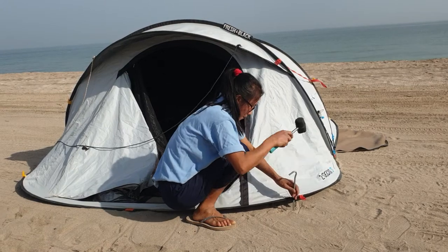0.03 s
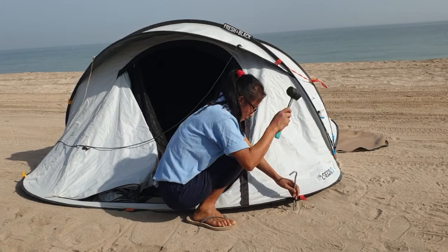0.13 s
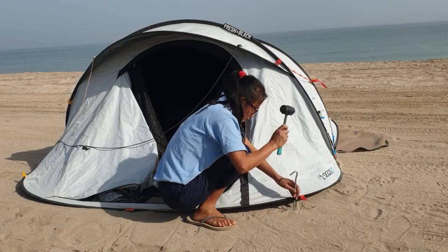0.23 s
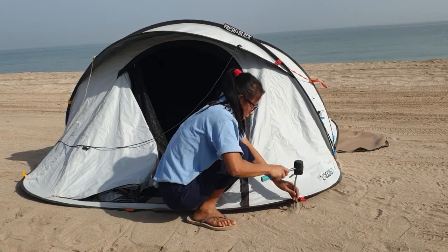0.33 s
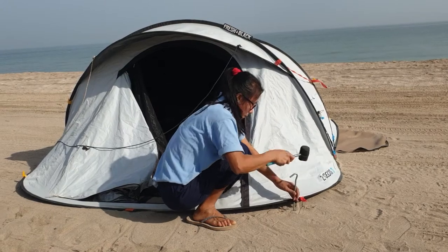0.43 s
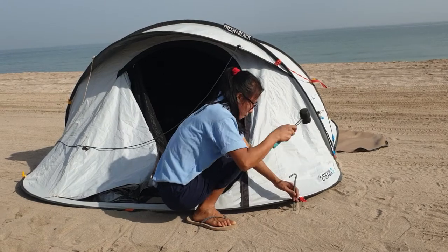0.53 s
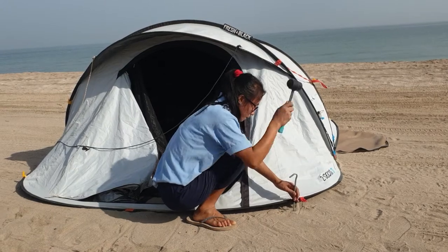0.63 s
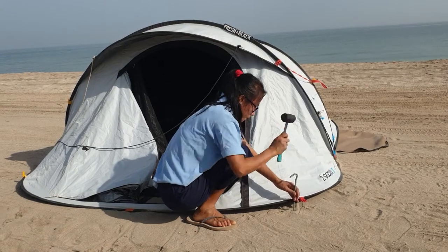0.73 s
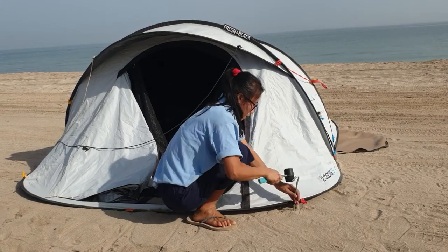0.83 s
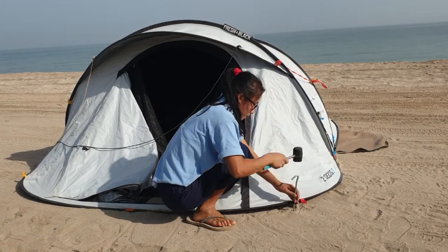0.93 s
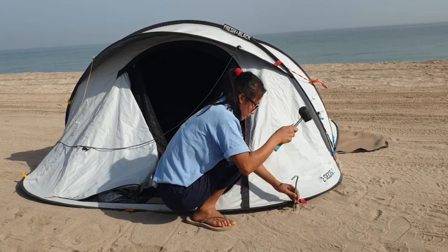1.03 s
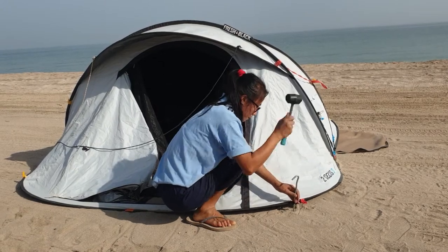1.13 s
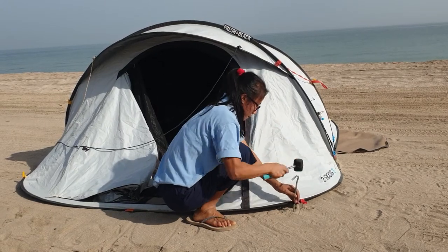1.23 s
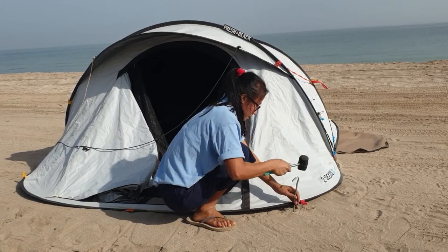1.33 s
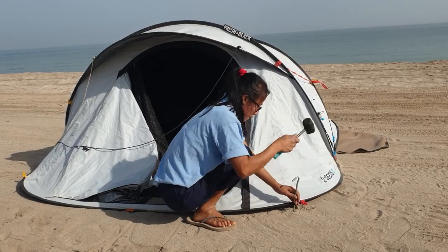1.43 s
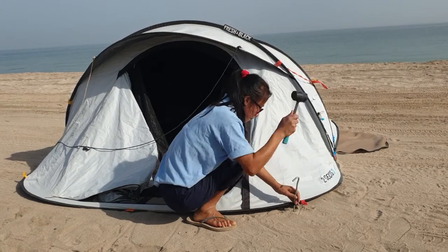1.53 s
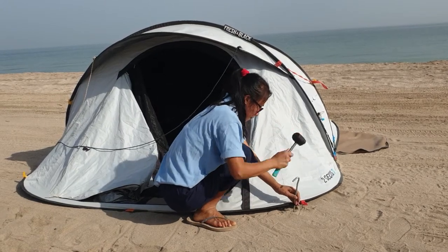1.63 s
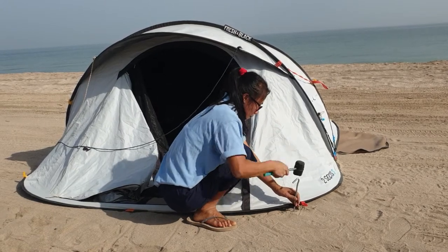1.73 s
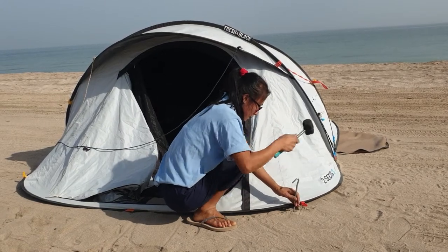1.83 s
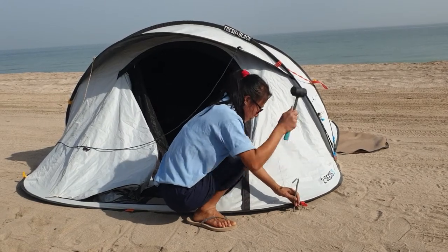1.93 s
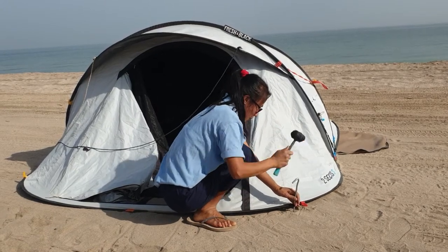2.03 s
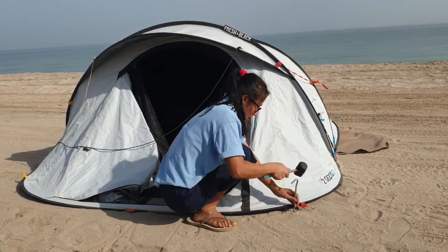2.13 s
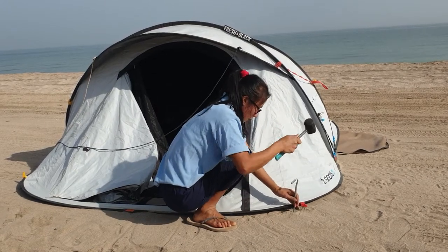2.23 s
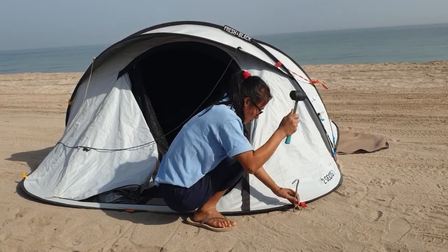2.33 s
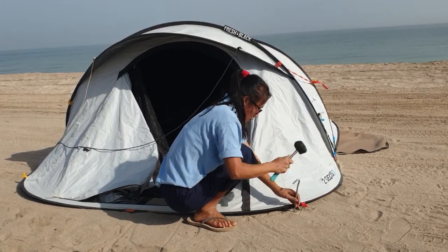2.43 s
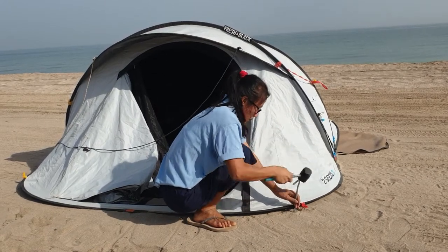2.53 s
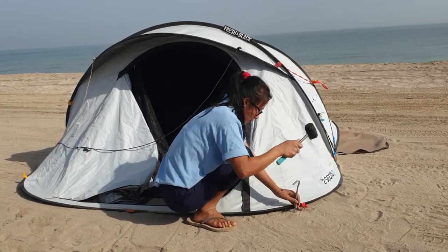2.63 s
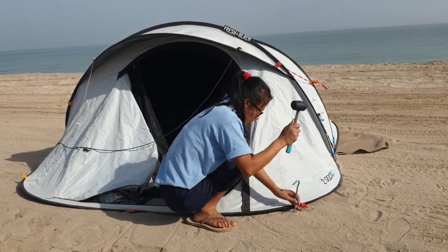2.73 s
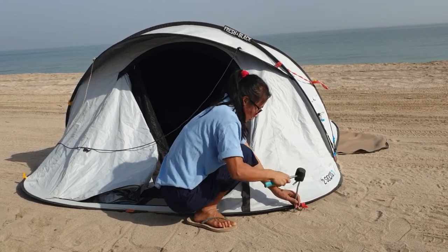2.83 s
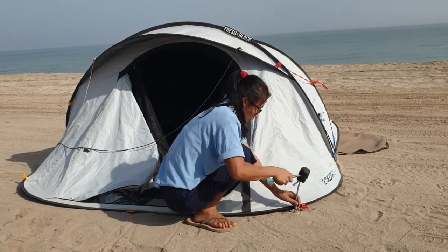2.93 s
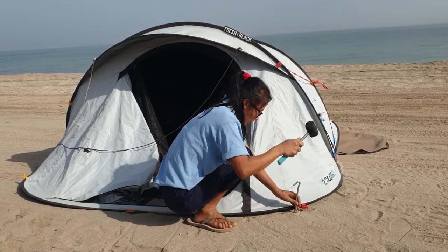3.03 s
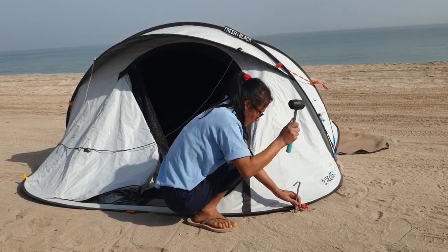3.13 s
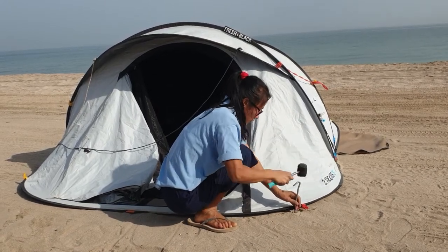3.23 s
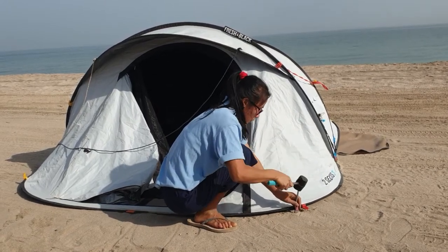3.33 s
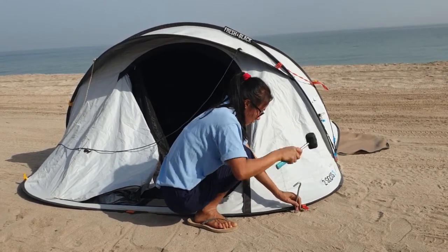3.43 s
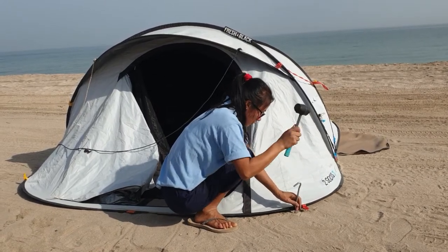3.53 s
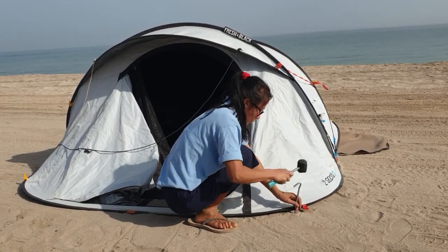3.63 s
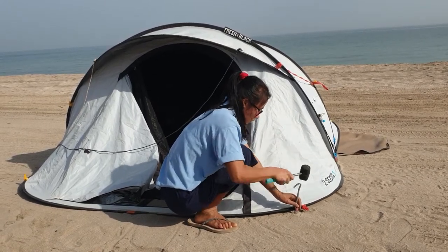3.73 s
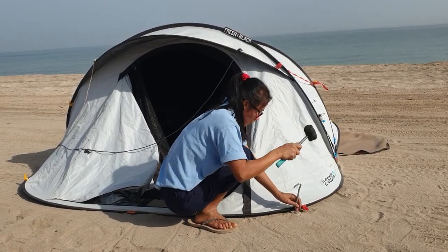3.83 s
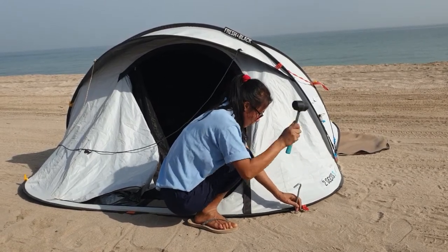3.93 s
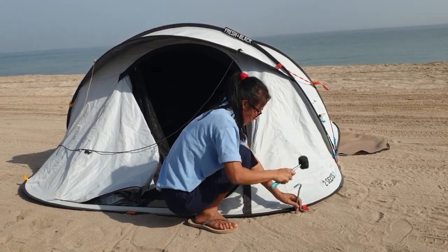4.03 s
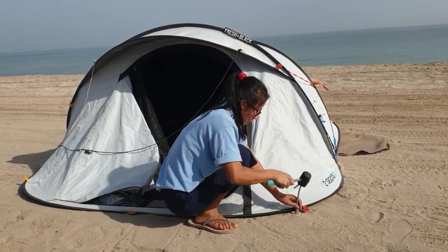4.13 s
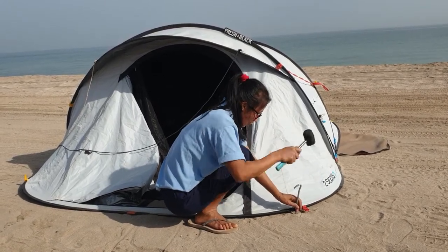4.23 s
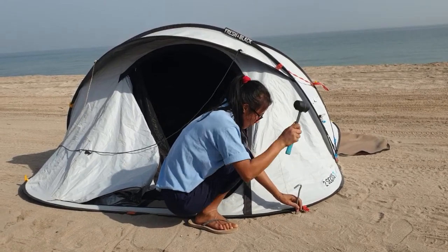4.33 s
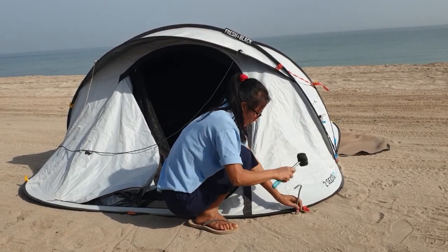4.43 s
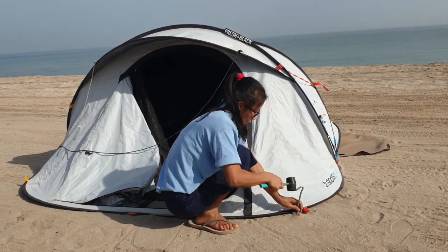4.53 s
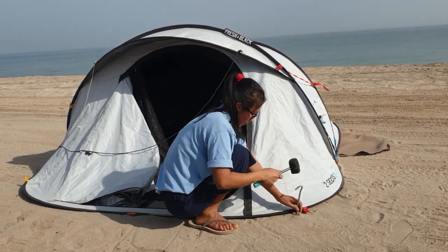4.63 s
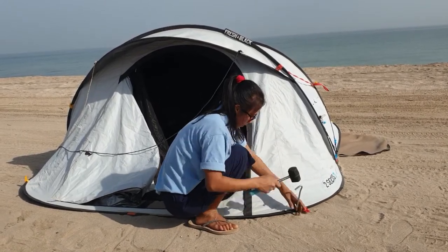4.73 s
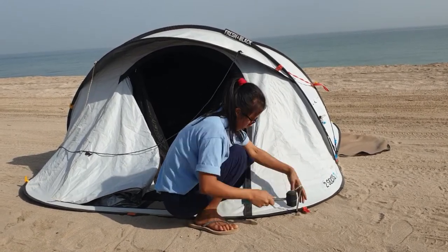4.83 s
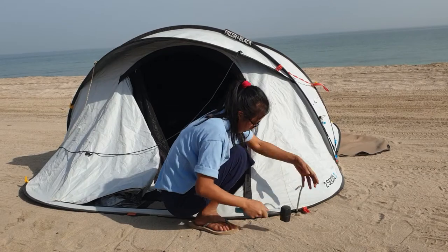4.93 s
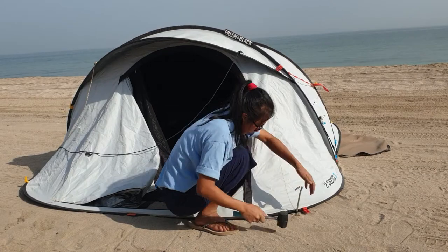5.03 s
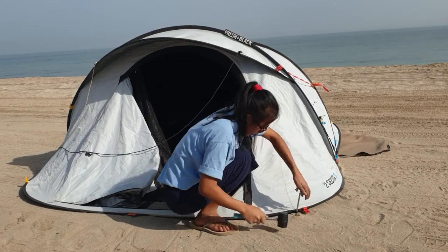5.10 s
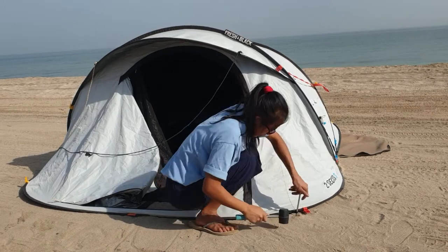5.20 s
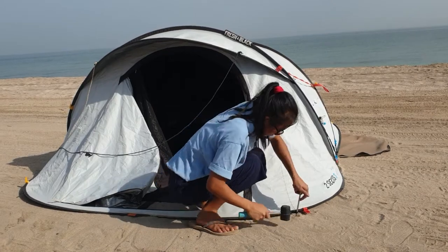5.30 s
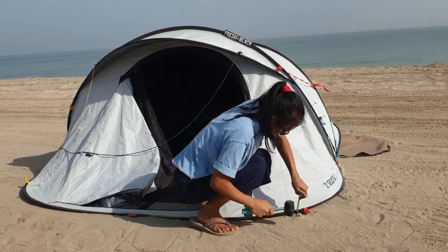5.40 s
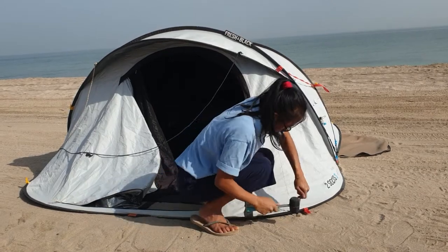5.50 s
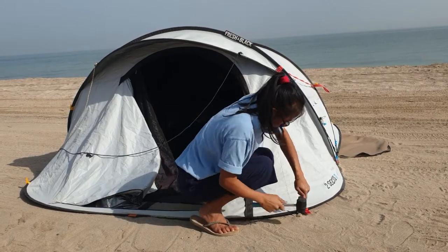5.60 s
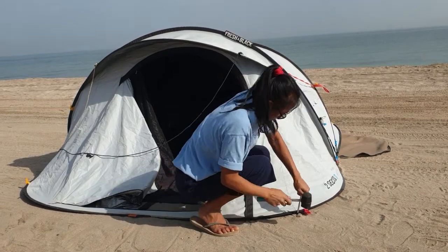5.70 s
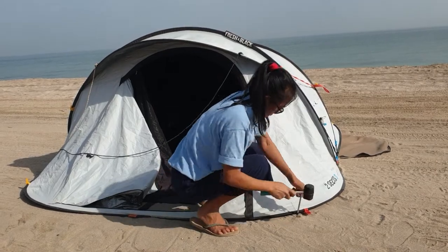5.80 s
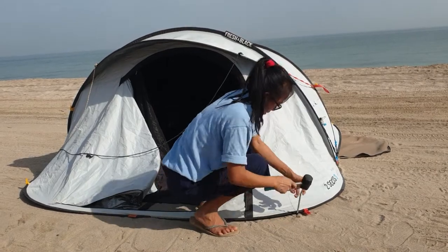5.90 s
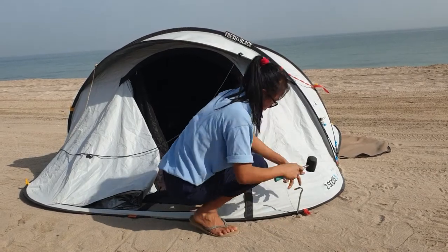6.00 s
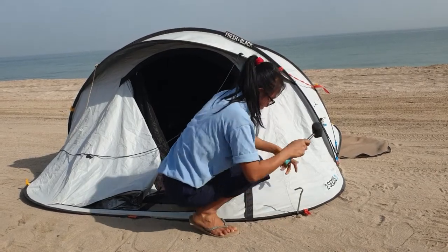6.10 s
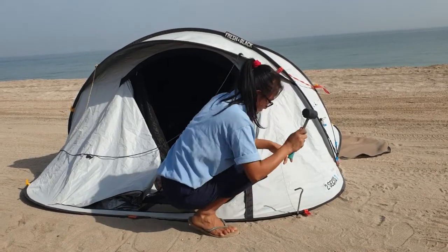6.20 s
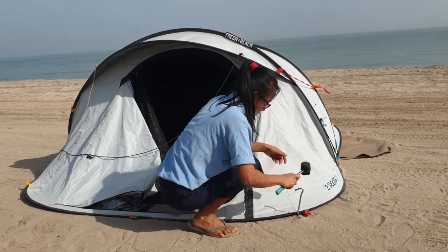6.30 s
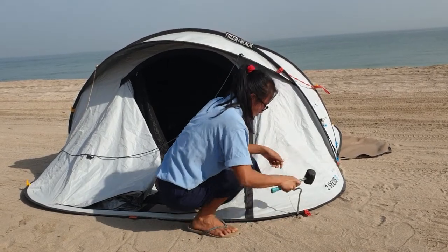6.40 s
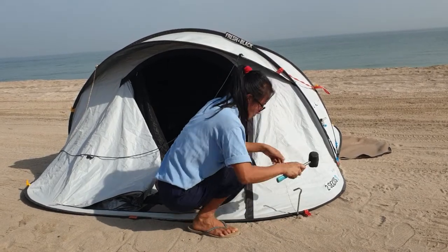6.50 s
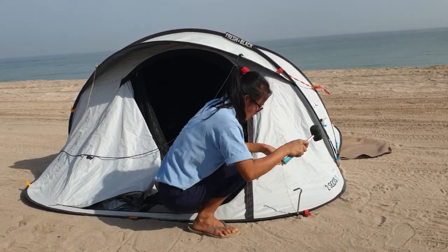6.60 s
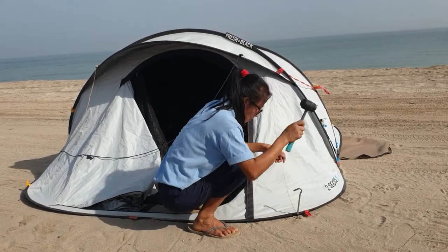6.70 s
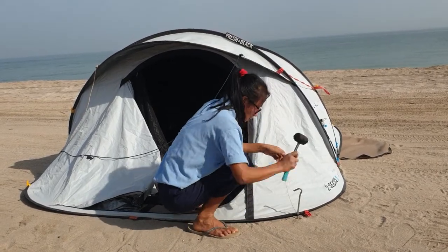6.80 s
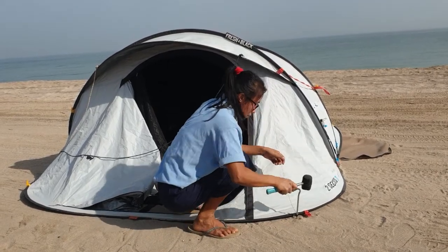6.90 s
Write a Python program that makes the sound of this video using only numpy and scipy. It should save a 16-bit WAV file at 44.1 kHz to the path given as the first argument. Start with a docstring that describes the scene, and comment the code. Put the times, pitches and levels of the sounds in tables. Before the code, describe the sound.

Outdoors on an open beach, close stereo microphone with faint hiss. A low breeze rumble and small soft waves run throughout, swelling most near 3.5 and 5.9 s. Slightly right, a rubber mallet strikes a steel peg in sand at 0.35, 0.83, 1.3, 1.7, 2.1, 2.5, 2.9, 3.3, 3.7, 4.1 and 4.5 s. Each blow is a short dull thud with a damped metallic knock, fine gritty crack and trickling grains; light rebounds follow some. The thud begins low and loose and rises quickly in pitch over the first several blows as sand packs, the trickle shortening. Very faint gliding bird chirps appear before 2.8 s. From 4.7 s cloth rustles; a scratchy tick sounds left at 5.15, soft bumps at 5.3 and 5.8-5.9, scuffs and stronger rustling around 6.0-6.1. Two firm, higher blows land at 6.36 and 6.89 s, with a brief rustle between.

```python
"""Hammering a tent peg on a beach

A rubber mallet drives a steel peg into sand beside a tent: thuds, damped steel modes and grain cracks,
the thud rising in pitch as the sand packs. Decaying grains trickle after each blow. Soft bumps and
scuffs fill a pause as the mallet is set down; clothes rustle as swelling clumps of grains.
Small waves, swells of filtered noise, break over a low breeze, with a few far gliding bird chirps."""
import sys
import numpy as np
from scipy import signal
from scipy.fft import rfft, irfft, next_fast_len
from scipy.io import wavfile

SR = 44100
rng = np.random.default_rng(int(sys.argv[2]) if len(sys.argv) > 2 else 0)


def wav_record(signal):
    """Record a signal, one row per channel, as 16-bit PCM in the file named by sys.argv[1]."""
    frames = np.transpose(np.atleast_2d(signal))
    bounded = np.clip(frames, -1, 1)
    # unit amplitude maps onto the largest positive 16-bit level
    quanta = np.round(bounded * 32767).astype(np.int16)
    wavfile.write(sys.argv[1], SR, quanta)


N = 306737
BLOW_SIZE = SR // 4   # samples
AGE_S = np.arange(BLOW_SIZE) / SR

# mallet on peg: (time [s], force [dB], sand's grip on the shaft [0-1], hook clack [dB], crack [dB])
BLOWS = [(0.346, -2.5, 0.19, -42, -37), (0.8315, -1.5, 0.31, -39, -37), (1.293, -2, 0.28, -36, -38.5),
         (1.715, 0.1, 0.2, -36.5, -36), (2.1179, 0.5, 0.27, -42, -39), (2.5093, 0, 0.41, -33, -38.5),
         (2.8883, 0.4, 0.5, -32.5, -35.5), (3.2925, 0.5, 0.68, -27.5, -33.5),
         (3.6962, 0.7, 0.66, -43, -40.5), (4.099, 1.3, 0.74, -32, -37.5), (4.501, 0.5, 1, -30.5, -36),
         (6.3644, 0.35, 0.77, -35.5, -39.5), (6.8889, 0, 0.93, -33, -35.5)]
# steel on sand grains, relative spectrum: (frequency [Hz], density [dB per Hz])
CRACK_SPECTRUM = [(2500, -4.5), (3800, -1.5), (5000, -0.5), (6200, 1), (7500, -0.5), (9000, -10),
                  (10700, -4.5), (13000, -11.5), (16000, -11.5)]


def from_db(db):
    """Decibels to gain."""
    return 10 ** (np.asarray(db) / 20)


def rms_one(x):
    """Scale to rms 1."""
    return x / np.sqrt(np.mean(x ** 2) + 1e-20)


def at_level(x, db):
    """Scale a short sound so that its energy, spread over 20 ms, has this level."""
    return from_db(db) * x / np.sqrt(np.sum(x ** 2) / (0.02 * SR) + 1e-20)


def add(track, time_s, sound):
    """Mix a sound into a track at a given time."""
    i = max(0, round(time_s * SR))
    track[i:i + len(sound)] += sound[:N - i]


def delayed(x, delay_s):
    """Delay by a phase ramp, which allows fractions of a sample."""
    size = next_fast_len(len(x) + SR // 10)
    phase = np.exp(-2j * np.pi * np.fft.rfftfreq(size, 1 / SR) * delay_s)
    return irfft(rfft(x, size) * phase, size)[:len(x)]


def cut(x, hz, kind, order=2):
    """Butterworth low- or high-pass."""
    sos = signal.butter(order, min(hz, SR / 2 - 1), kind, fs=SR, output="sos")
    return signal.sosfilt(sos, x)


def colour(x, spectrum):
    """Causal (minimum-phase) filter that follows a spectrum."""
    size = 4096
    hz, db = np.transpose(spectrum)
    grid_hz = np.maximum(np.fft.rfftfreq(size, 1 / SR), 1)
    gain = from_db(np.interp(np.log(grid_hz), np.log(hz), db))
    # folding the cepstrum onto positive time gives minimum phase
    cepstrum = irfft(np.log(gain))
    cepstrum[1:size // 2] *= 2
    cepstrum[size // 2 + 1:] = 0
    response = irfft(np.exp(rfft(cepstrum)))
    return signal.fftconvolve(x, response)[:len(x)]


def drift(rate_hz):
    """Slow random wander of rms 1: two-pole filtered noise, computed every 40 samples."""
    step = 40
    pole = np.exp(-2 * np.pi * rate_hz * step / SR)
    noise = rng.standard_normal(N // step + 2002)
    slow = signal.lfilter([1], [1, -2 * pole, pole * pole], noise)[2000:]   # settled part
    return np.interp(np.arange(N) / step, np.arange(len(slow)), rms_one(slow))


def dying(t60_s):
    """Envelope that falls 60 dB in t60."""
    return np.exp(-np.log(1000) * AGE_S / t60_s)


def swell(peak_s, rise_s, fall):
    """A smooth hump of height 1 that falls this many times as slowly as it rises."""
    t = np.arange(N) / SR - peak_s
    width_s = np.where(t < 0, rise_s, rise_s * fall)
    return 1 / (1 + (t / width_s) ** 2 / 2) ** 1.5


def between(loose, packed, share):
    """A value part of the way from loose to packed sand."""
    return loose + share * (packed - loose)


def grains(size, spread_db):
    """Dense tiny clicks of uneven size."""
    size_db = spread_db * np.clip(rng.standard_normal(size), -2, 2)
    return rms_one(rng.standard_normal(size) * from_db(size_db))


def wide_noise(spectrum, side_db):
    """Noise that is partly different at the two ears."""
    mid, side = [rms_one(colour(rng.standard_normal(N), spectrum)) for _ in range(2)]
    return mid + from_db(side_db) * side * [[1], [-1]]


def ring(modes, scatter_db):
    """Struck modes, each a decaying sine with a slightly new strength."""
    out = np.zeros(BLOW_SIZE)
    for hz, t60_s, db in modes:
        gain = from_db(db + scatter_db * rng.normal())
        out += gain * dying(t60_s) * np.sin(2 * np.pi * hz * AGE_S)
    return out


def hammering():
    """Blows, rebounds and bumps, with the grit that each blow shakes loose."""
    # peg modes, damped by sand and hand:
    # (frequency [Hz], t60 [s], loose-sand relative level [dB], firm-sand relative level [dB])
    peg_modes = [(394.7, 0.11, -46, -9), (680, 0.016, -22, 6.5), (798, 0.017, 18, -48),
                 (1017, 0.021, -3, -17), (1290, 0.017, -34, -8), (1459, 0.024, -19.5, -21)]
    # high modes of the peg's hook, same columns: (frequency [Hz], t60 [s], loose [dB], firm [dB])
    hook_modes = [(1465, 0.02, 5, 5.5), (2103, 0.016, 7.5, -18), (2610, 0.025, -12, 1),
                  (3200, 0.012, 4, -.5), (4960, 0.024, -31, 4)]
    # mallet touches the peg again on the rebound: (time [s], ring level [dB], crack level [dB])
    rebounds = [(.845, -54, -51), (1.338, -56, -74), (1.742, -40.5, -55), (2.158, -37, -50),
                (2.548, -45, -62), (3.362, -56, -56), (4.511, -37, -42.5), (4.652, -62, -69),
                (6.618, -55.5, -71.5)]
    # soft bumps on the sand: (time [s], pitch [Hz], level [dB])
    bumps = [(5.271, 228, -37), (5.346, 177, -34), (5.787, 244, -39), (5.93, 226, -37.5)]
    # trickling sand: (frequency [Hz], density [dB per Hz])
    grit_spectrum = [(300, -6), (700, -2), (1300, -3), (2000, 2.5), (3000, -3.5), (5000, 1), (7500, -1.5),
                     (10000, -18.5), (13000, -10), (16000, -14)]
    packing_blows, packing_curve = 3.3, 1.23   # blows to two thirds packed; >1: first blows pack less

    out, grit = np.zeros(N), np.zeros(N)
    for blows_so_far, (time_s, force_db, grip, clack_db, crack_db) in enumerate(BLOWS):
        packed = 1 - np.exp(-(blows_so_far / packing_blows) ** packing_curve)
        thud_hz = between(120, 275, packed)
        thud_db = force_db + between(-26.5, -21.5, packed)
        ring_db = force_db + between(-23, -24.5, packed)
        grit_db = crack_db + between(-5, -2.5, packed)   # ahead of grit_spectrum
        grit_t60_s = between(0.39, 0.22, packed)   # loose sand trickles for longer
        # the peg's ring starts just before the thud and crack
        add(out, time_s - 0.0005, at_level(gripped_ring(peg_modes, grip), ring_db))
        add(out, time_s, at_level(thud(thud_hz, swell_s=0.0013), thud_db))
        add(out, time_s, at_level(ground(), thud_db - 19.5))
        add(out, time_s, at_level(gripped_ring(hook_modes, grip), clack_db))
        add(out, time_s, at_level(crack(), crack_db))
        add(out, time_s, at_level(shudder(), thud_db - 10))
        trickle = dying(grit_t60_s) * (1 - dying(0.008))
        add(grit, time_s, from_db(grit_db) * grains(BLOW_SIZE, spread_db=3) * trickle)
    for time_s, ring_db, crack_db in rebounds:
        add(out, time_s, at_level(gripped_ring(peg_modes, 0.28), ring_db))
        add(out, time_s, at_level(crack(), crack_db))
    for time_s, hz, db in bumps:
        add(out, time_s, at_level(thud(hz, swell_s=0.0018), db))
    tent_echo = from_db(-20) * delayed(cut(out, 510, "high"), delay_s=0.0142)
    return cut(out, 83, "high") + tent_echo + colour(grit, grit_spectrum)


def thud(hz, swell_s):
    """Mallet head and sand give way together: a short low sine that swells and dies."""
    return cut(-AGE_S * np.exp(-AGE_S / swell_s) * np.sin(2 * np.pi * hz * AGE_S), 54, "high")


def gripped_ring(modes, firmness):
    """Firm sand grips the shaft and shifts the weight among its modes."""
    gripped = [(hz, t60_s, between(loose_db, firm_db, firmness)) for hz, t60_s, loose_db, firm_db in modes]
    return ring(gripped, scatter_db=1.5)


def ground(hz=150, swell_s=0.0043):
    """The sand around the peg answers with a slower-dying bounce."""
    return cut(-AGE_S * np.exp(-AGE_S / swell_s) * np.cos(2 * np.pi * hz * AGE_S), 36, "high")


def crack(snap_t60_s=0.0054, scrape_t60_s=0.0085, scrape_db=-14):
    """Steel snaps against sand grains, then scrapes briefly as it slides in."""
    envelope = dying(snap_t60_s) + from_db(scrape_db) * dying(scrape_t60_s)
    return colour(grains(BLOW_SIZE, spread_db=8) * envelope, CRACK_SPECTRUM)


def shudder(low_hz=170, high_hz=450, t60_s=0.2):
    """The pegged tent skin shakes after a blow: band-passed noise with a soft onset."""
    shake = cut(rng.standard_normal(BLOW_SIZE), low_hz, "high")
    shake = cut(shake, high_hz, "low", order=4)
    return shake * dying(t60_s) * (1 - dying(0.03))


def sand_scatter(t60_s=0.035, below_crack_db=4):
    """Rough sand scatters each blow's crack, so each ear also gets a short spray of its own."""
    out = np.zeros((2, N))
    for time_s, *_, crack_db in BLOWS:
        for ear in out:
            spray = colour(grains(BLOW_SIZE, spread_db=7) * dying(t60_s), CRACK_SPECTRUM)
            add(ear, time_s + 0.0005, at_level(spray, crack_db - below_crack_db))
    return out


def scuffs():
    """Packed sand under peg, mallet and sandals shears in short runs of slips that ring its modes."""
    # (time [s], length [s], level [dB])
    scuff_times = [(0.842, 0.13, -54), (3.126, 0.078, -59.5), (5.309, .07, -61.5), (5.97, 0.14, -51.5),
                   (6.081, .08, -53.5)]
    # (frequency [Hz], t60 [s], relative level [dB])
    scuff_modes = [(745, 0.0056, 9.5), (1190, 0.0025, -16), (1690, 0.01, -2.5), (2550, 0.0061, -5),
                   (4320, 0.0035, -4)]
    out = np.zeros(N)
    for time_s, length_s, db in scuff_times:
        size = int(length_s * SR)
        slips = grains(size, spread_db=16.5) * np.hanning(size)
        body = signal.fftconvolve(slips, ring(scuff_modes, scatter_db=2))
        add(out, time_s, from_db(db) * body / np.sqrt(np.sum(body ** 2) / size))
    return out


def rustle():
    """Fabric rubs in uneven clumps of grains, swelling with each movement of the camper."""
    # (peak time [s], rise [s], level [dB])
    rubs = [(1.17, 0.028, -64.5), (3.18, 0.036, -68), (4.7, 0.029, -64), (4.85, 0.032, -61.5),
            (5.88, 0.05, -64.5), (6.04, 0.037, -59.5), (6.13, 0.059, -58), (6.622, .01, -57),
            (6.755, 0.052, -63.5)]
    # cloth, relative spectrum: (frequency [Hz], density [dB per Hz])
    cloth_spectrum = [(300, 3), (750, -14), (1650, 3.5), (2400, 4.5), (4500, 1.5), (6000, 10.5), (7600, 8),
                      (9500, -12), (12000, -9), (16000, -18)]
    movement = sum(from_db(db) * swell(peak_s, rise_s, fall=1.23) for peak_s, rise_s, db in rubs)
    clumps = from_db(2.3 * drift(35))
    return movement * clumps * rms_one(colour(grains(N, spread_db=6), cloth_spectrum))


def from_the_right(x):
    """The camper is a little to the right, so the left ear hears later and duller."""
    # (frequency [Hz], left minus right [dB])
    lean = [(100, 1), (1000, -0.5), (2000, -3.5), (3500, -8), (5500, -3.5), (8000, -1.5), (12500, -2.5)]
    left = delayed(colour(x, [(hz, db / 2) for hz, db in lean]), delay_s=0.000096)
    right = colour(x, [(hz, -db / 2) for hz, db in lean])
    return np.array([left, right])


def tick():
    """A short scratchy contact off to the left that leaves a faint hiss, different at each ear."""
    # (time [s], level [dB])
    tick_times = [(5.143, -39.5)]
    # relative spectrum: (frequency [Hz], density [dB per Hz])
    tick_spectrum = [(1500, -38), (3500, -18), (5200, -5.5), (7570, 3.5), (8600, -4), (11500, -2.5),
                     (15500, -10)]
    out = np.zeros((2, N))
    contact = rng.standard_normal(BLOW_SIZE) * dying(0.0066)
    spray_envelope = from_db(-7.5) * dying(0.014) + from_db(-33) * dying(0.25)
    for time_s, db in tick_times:
        for ear, lag_s in zip(out, (0, 0.00038)):
            spray = rng.standard_normal(BLOW_SIZE) * spray_envelope
            add(ear, time_s + lag_s, at_level(colour(contact + spray, tick_spectrum), db))
    return out


def sea():
    """Each wave hisses as it curls, then booms and washes out, over far surf and an uneven breeze."""
    # small waves: (crest time [s], rise [s], wash level [dB], foam level [dB])
    waves = [(.08, 0.18, -60.5, -90), (1.0, 0.17, -60.5, -70), (2.4, 0.4, -60.5, -69),
             (3.48, 0.31, -54, -67), (5.3, 0.3, -60.5, -71), (5.92, 0.35, -55.5, -71.5),
             (6.58, 0.26, -63, -91)]
    # relative spectra: (frequency [Hz], density [dB per Hz])
    rumble_spectrum = [(22, -7), (32, 0.5), (45, 3.5), (65, 3.5), (110, 1.5), (180, -4), (260, -3),
                       (370, -11), (480, -11.5), (700, -37)]
    wash_spectrum = [(330, -8.5), (480, 5.5), (650, -0.5), (830, -3), (1020, -12.5), (1200, -9),
                     (1420, -23), (1800, -12), (2120, -19), (2800, -17), (3600, -28.5)]
    foam_spectrum = [(2600, 6), (3400, -1), (4600, 3.5), (6000, 1.5), (7600, -1.5), (8600, -21),
                     (10000, -19), (12000, -28), (15500, -24)]
    fall = 1.38   # fall time / rise time
    foam_lead_s, foam_spread = 0.17, 1.15   # the crest hisses before it falls, and for longer
    boom_db = 14   # a wave's rumble above its wash
    breeze_db, calm_wash_db, calm_foam_db = -47, -67, -75   # between waves

    surf_power, foam_power = np.zeros(N), np.zeros(N)
    for crest_s, rise_s, wash_db, foam_db in waves:
        surf_power += (from_db(wash_db) * swell(crest_s, rise_s, fall)) ** 2
        foam_power += (from_db(foam_db) * swell(crest_s - foam_lead_s, rise_s * foam_spread, fall)) ** 2
    surf, foam = np.sqrt(surf_power), np.sqrt(foam_power)
    gusts = from_db(1.1 * drift(6))
    rumble_level = np.hypot(from_db(breeze_db), from_db(boom_db) * surf) * gusts
    rumble = rumble_level * wide_noise(rumble_spectrum, side_db=-15)
    wash = np.hypot(from_db(calm_wash_db), surf) * wide_noise(wash_spectrum, side_db=0)
    hiss = np.hypot(from_db(calm_foam_db), foam) * wide_noise(foam_spectrum, side_db=0.5)
    return cut(rumble, 1200, "low") + cut(wash, 3540, "low") + hiss


def birds():
    """Far birds: short gliding whistles with a slight pitch wobble."""
    # (time [s], start pitch [Hz], end pitch [Hz], level [dB])
    chirps = [(.272, 4500, 3540, -69), (.585, 5880, 5800, -73), (0.695, 5500, 5760, -75),
              (1.356, 4780, 5200, -65), (1.62, 4450, 3660, -69), (1.635, 3380, 3020, -62),
              (2.251, 5900, 5960, -69), (2.698, 3050, 3200, -67)]
    chirp_s = 0.041
    out = np.zeros(N)
    for time_s, start_hz, end_hz, db in chirps:
        hz = np.geomspace(start_hz, end_hz, int(chirp_s * SR))
        hz = hz * (1 + 0.016 * drift(150)[:len(hz)])
        whistle = np.hanning(len(hz)) * np.sin(2 * np.pi * np.cumsum(hz) / SR)
        add(out, time_s, from_db(db) * whistle)
    return out


def scene():
    """The work at the peg against the open beach."""
    near = hammering() + scuffs() + rustle()
    return from_the_right(near) + sand_scatter() + tick() + sea() + birds()


def record(dry):
    """The microphone colours the sound and adds its faint steady hiss; the top is cut."""
    # uneven response: (frequency [Hz], gain [dB])
    response = [(20, -24.5), (60, 0.5), (300, -0.5), (370, 1.5), (430, -8), (490, -9.5), (600, 0),
                (820, -0.5), (900, 0.5), (1050, -1), (1200, 1.5), (1600, 3.5), (1850, -3), (2200, -1)]
    # own hiss, relative spectrum: (frequency [Hz], density [dB per Hz])
    self_noise = [(3000, -3.5), (7500, -9.5), (9500, -3.5), (12000, 2), (15500, 1)]
    self_noise_db, cutoff_hz = -80.5, 16100
    coloured = np.array([colour(channel, response) for channel in dry])
    noisy = coloured + from_db(self_noise_db) * wide_noise(self_noise, side_db=0.5)
    return signal.sosfilt(signal.ellip(10, 0.1, 80, cutoff_hz, fs=SR, output="sos"), noisy)


dry = scene()
out = record(dry)
wav_record(out)
```